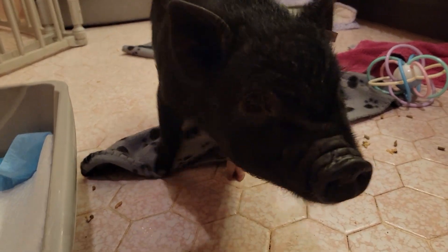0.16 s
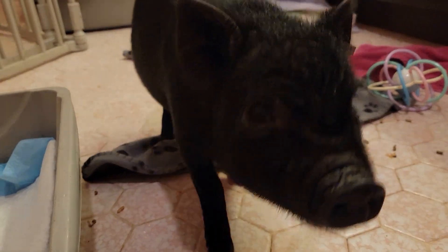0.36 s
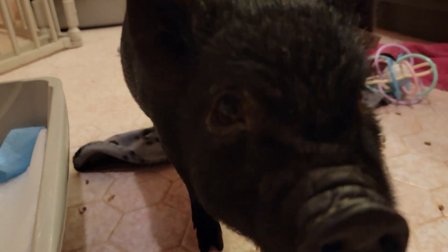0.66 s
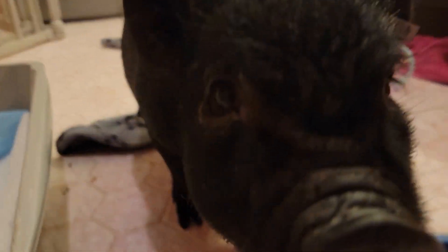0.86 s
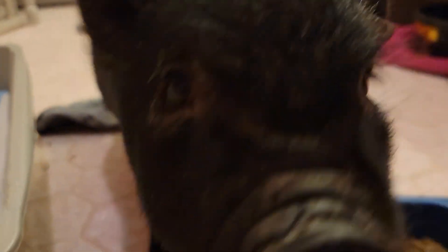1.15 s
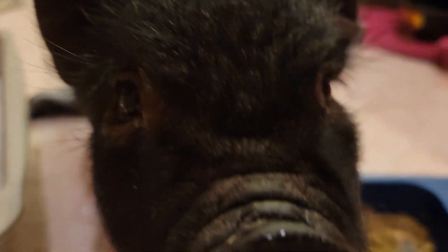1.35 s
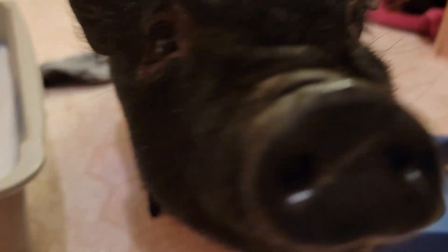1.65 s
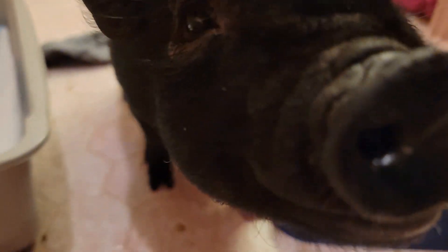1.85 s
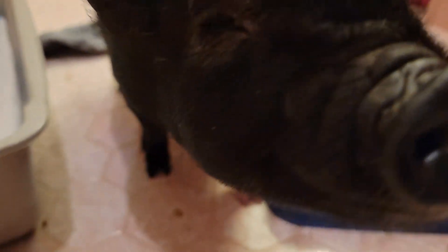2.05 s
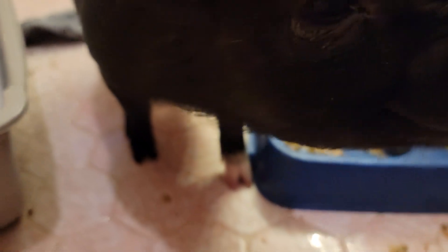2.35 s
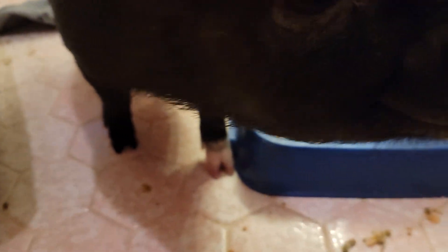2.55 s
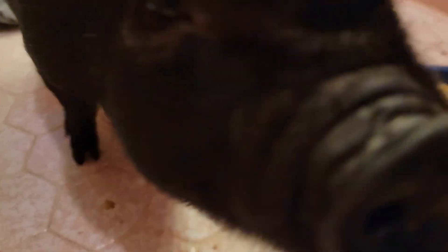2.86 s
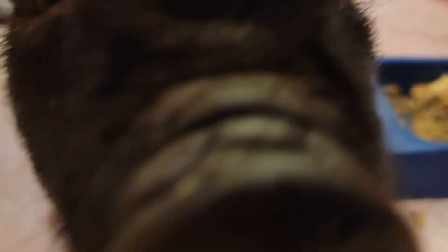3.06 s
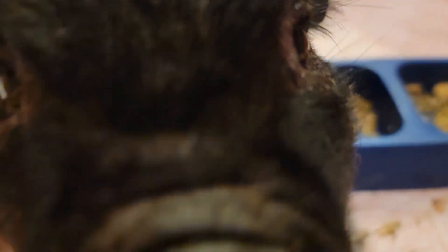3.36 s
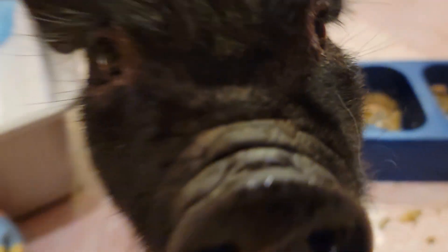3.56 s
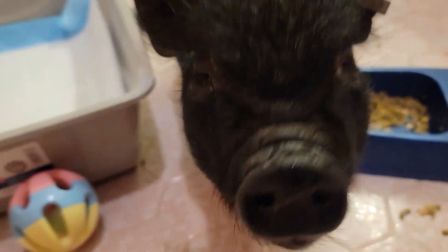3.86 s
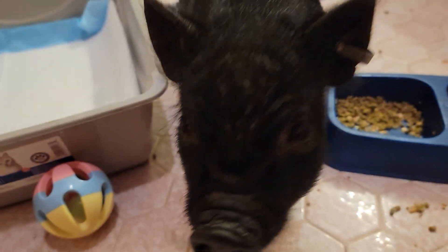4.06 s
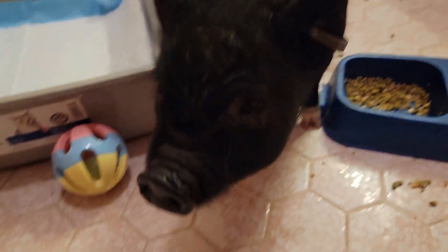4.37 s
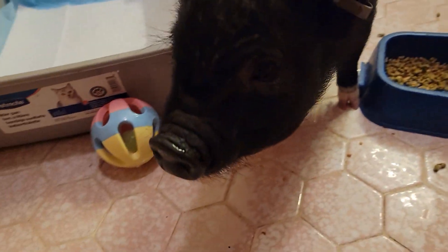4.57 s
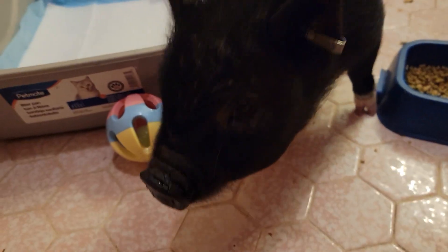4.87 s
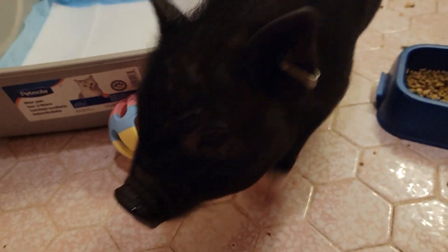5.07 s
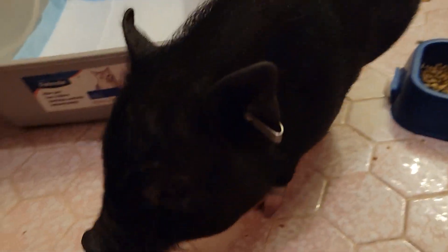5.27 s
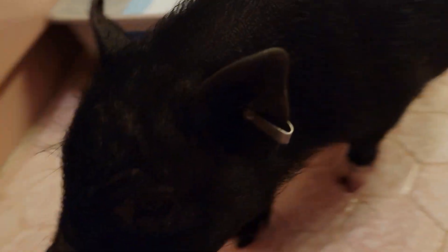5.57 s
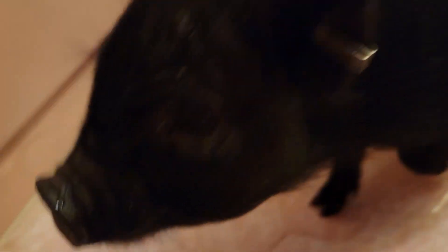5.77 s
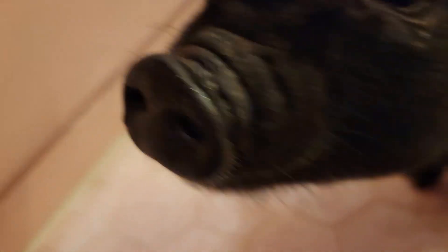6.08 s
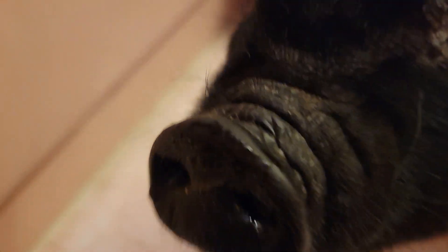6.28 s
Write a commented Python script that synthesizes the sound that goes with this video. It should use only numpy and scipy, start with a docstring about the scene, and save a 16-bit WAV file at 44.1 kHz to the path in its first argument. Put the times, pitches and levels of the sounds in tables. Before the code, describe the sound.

A small piglet gives short, creaky grunts right against the microphone in a tiled room, with two hollow bumps and a rustle at the end.

```python
"""A piglet grunts right at the microphone in a small tiled room, over a low background hush.
Each grunt is a few slow flaps of the vocal folds, clicks and gushes of noise that ring throat and snout;
then a noise puff leaves the nostrils. Something hollow is bumped twice: a noise crash, then dying sines.
Soft thuds are short low sines, hoof ticks dying clicks; sniffs and a growing rustle are swells of noise.
"""
import sys
import numpy as np
from scipy import signal
from scipy.fft import rfft, irfft, next_fast_len
from scipy.io import wavfile
from scipy.ndimage import uniform_filter1d

SR = 44100
rng = np.random.default_rng(int(sys.argv[2]) if len(sys.argv) > 2 else 0)


def unload_wav(signal):
    """Save mono or channel-first audio to the path in sys.argv[1] as 16-bit WAV at rate SR, clipped to [-1, 1]."""
    wavfile.write(
        sys.argv[1],
        SR,
        np.round(np.clip(np.atleast_2d(signal).T, -1, 1) * 32767).astype(np.int16),
    )


N = 283122


def amp(db):
    """Gain for a level in dB."""
    return 10 ** (np.asarray(db) / 20)


def evened(x):
    """Scaled to rms 1."""
    return x / np.sqrt(np.mean(x ** 2) + 1e-20)


def read(points, hz):
    """Reads (Hz, value) points on a log-frequency axis."""
    f, value = np.transpose(points)
    return np.interp(np.log(hz + 1), np.log(f + 1), value)


def along(curve, s):
    """Value of a control curve (s, value) at time s."""
    return np.interp(s, *np.transpose(curve))


def add(mix, s, sound):
    """Mixes a sound in at time s, cutting what falls outside."""
    start = round(s * SR)
    sound = sound[..., max(-start, 0):]
    part = mix[..., max(start, 0):][..., :sound.shape[-1]]
    part += sound[..., :part.shape[-1]]


def noise(spectrum, size):
    """Two channels of coloured noise at rms 1, most alike in the bass."""
    # likeness of left and right: f/Hz, correlation
    likeness = [(50, 0.54), (130, 1), (300, 0.79), (700, 0), (16000, 0.049)]
    padded = next_fast_len(size, True)
    hz = np.fft.rfftfreq(padded, 1 / SR)
    a, b = rfft(rng.standard_normal((2, padded)))
    same = np.clip(read(likeness, hz), -1, 1)
    pair = np.array([a, same * a + np.sqrt(1 - same ** 2) * b])
    return evened(irfft(pair * amp(read(spectrum, hz)), padded)[:, :size])


def ring(modes, t):
    """Dying sines from rows (Hz, dB, t60 in s)."""
    return sum(amp(db - 60 * t / t60) * np.sin(2 * np.pi * hz * t) for hz, db, t60 in modes)


def lowpass(x, hz, order):
    """Takes off the treble above hz."""
    return signal.sosfilt(signal.butter(order, min(hz, SR / 2.1), fs=SR, output="sos"), x)


def swells(rows):
    """A gain curve of smooth humps from rows (s of peak, length s, dB)."""
    t = np.arange(N) / SR
    return sum(amp(db) * np.exp(-(2 * (t - s) / length) ** 2) for s, length, db in rows)


def sputter(size, depth_db):
    """Uneven gain of air forced through wet nostrils, in grains of a few milliseconds."""
    grains = evened(uniform_filter1d(rng.standard_normal(size), size=140))
    return evened(amp(depth_db * grains))


def flap(times, levels_db, t, hz, rasp, rasp_length):
    """Spectrum of fold closures, each a click and a gush of turbulent air that rises fast and fades."""
    clicks, gush = 0, 0
    for s, db in zip(times, levels_db):
        clicks = clicks + amp(db) * np.exp(-2j * np.pi * hz * s)
        # the gush rises twice as fast as it fades
        gush = gush + amp(db) * np.exp(-np.maximum(t - s, 2 * (s - t)) / rasp_length)
    turbulence = rfft(gush * rng.standard_normal(len(t))) / np.sqrt(rasp_length * SR)
    return clicks + rasp * turbulence


def cavity(resonances, hz, stretch, scatter_db, nasal=False):
    """Response of ringing modes, mixed differently per channel; nasal ones start abruptly, each delayed."""
    travel_s = 0.001598  # the winding passages let each resonance out up to this much later
    out = 0
    for k, (centre, width, db) in enumerate(resonances):
        gain = amp(db + scatter_db * rng.standard_normal() * np.array([[1], [-1]]))
        if nasal:
            start = 1j * hz * np.exp(-2j * np.pi * hz * travel_s * rng.random())
        else:
            start = (-1) ** k * centre * stretch
        out = out + gain * start / ((width / 2 + 1j * hz) ** 2 + (centre * stretch) ** 2)
    return out * SR / (2 * np.pi)


def grunts():
    """Slow flaps swell in nose, chest and mouth; closures snap and ring the snout; a puff ends the grunt."""
    # one row a grunt: t of the hard closure/s, flap period/ms, body level/dB, snap level/dB,
    # swell across the snaps/dB, open mouth over the body/dB, puff level/dB,
    # hum of the nose f/Hz, upper snout resonance f/Hz
    grunt_rows = [ (-.04, 12.4, -23, -29, -13, -22, -46, 401, 4500),
                  (0.238, 16, -22.5, -24.5, -0.5, -8, -39.5, 438, 4200),
                  (.597, 13, -19.5, -22, -7.5, -9, -33.5, 410, 3900),
                  (0.829, 14, -22, -26.5, 3, -9.5, -35.5, 423, 4260),
                  (1.1517, 13.6, -22, -14, 6, -11, -34, 423, 4200),
                  (1.566, 14.6, -22.5, -15.5, 0.5, -20, -31, 451, 4630),
                  (1.909, 14.6, -24.5, -13.5, 0.5, -39, -29, 469, 4970),
                  (2.254, 17.6, -25.5, -21, -2, -8, -33.5, 470, 5530),
                  (2.753, 17.6, -25, -20, 1.5, -8, -30, 444, 4800),
                  (3.014, 14.1, -24, -17, 0.5, -10.5, -36.5, 438, 4570),
                  (3.198, 16.9, -25, -18, 4.5, -26, -42, 448, 4870),
                  (3.503, 15.6, -22, -17, 2.5, 2, -34, 523, 4560),
                  (3.891, 17.8, -24.5, -19, -1, -16, -35, 475, 5530),
                  (4.566, 18.9, -24, -19, 1, -32, -35.5, 505, 4700),
                  (5.007, 17.5, -26.5, -26, 1, -17, -37, 465, 5200),
                  (5.4184, 18.4, -25.5, -23.5, 7.5, -3, -38, 553, 3900),
                  (5.724, 19, -26, -29.5, 9, -24, -36.5, 558, 4300),
                  (6.026, 14.3, -22, -24.5, 2, -17, -36.5, 546, 4260),
                  (6.3, 14.1, -20, -23.5, -1, -12, -45, 490, 4160)]
    # the flaps of one grunt swell and fade; the third is the hard closure:
    # nose level/dB, chest level/dB, mouth level/dB
    flap_levels = [(-18.5, -11, -28), (-10, -0.5, -26), (-2.5, -6, -4), (0, 9, -4.5), (-1.5, 11, -7),
                   (-11, -30, -36)]
    # resonances of chest, mouth and snout: f/Hz (chest and mouth before a slight stretch), width/Hz, level/dB
    chest, mouth, snout_low = [(91.6, 14.2, -14), (158.5, 16.8, -11), (213.7, 161, -3)], [(556, 36, -0.5), (860, 73, -2.5), (1058, 57, 4)], [(710, 103, -4), (1027, 104, -14),
                                                             (1723, 96, -3.5), (2720, 290, -9),
                                                             (3042, 97, -6)]
    # resonances around the nose hum and at the upper snout: ratio to the grunt's own f, width/Hz, level/dB
    nose, snout_top = [(.84, 108, -4.5), (1, 56, 3), (1.2, 108, -6), (1.55, 135, -6)], [(0.998, 380, -3.5), (1.17, 600, -10.5)]
    # the closures that snap, one flap apart: level over the grunt's snap/dB, share of its swell,
    # f above which the treble falls/Hz
    snap_rows = [(-21, -0.82, 9600), (-1, -0.84, 27000), (0, 0.64, 4600), (-10.5, 0.39, 4000)]
    # clean in the middle grunts, raspy in the first and last: t/s, turbulence against the click
    hoarseness = [(.83, .9), (1.2, .25), (5.4, .25), (5.75, 1.2)]
    # the snout swings from side to side: t/s, left over right level/dB
    head_side = [(.6, -1.5), (1.57, 2.5), (2.25, -1), (2.75, -4), (3.2, 5.5), (3.5, 4), (3.9, 0.5),
                 (4.57, 1), (5.42, -3.5), (6.3, 0.5)]
    # the head hides the chest while it faces the microphone: t/s, chest level/dB
    chest_heard = [(1.2, 1.5), (3.2, 0.5), (3.8, -8.5), (4.6, -1.5)]
    # colour of the air through the nostrils: f/Hz, level/dB
    puff_colour = [(100, 6.5), (450, 5), (1200, 3.5), (1800, 1), (2700, 2.5), (3700, -3.5), (5800, -9.5),
                   (8000, -19.5), (16000, -19.5)]
    nose_sag = 0.069  # share by which the hum falls per flap as the grunt closes
    hoarse_hold_db = 9.5  # a hoarse grunt rasps on: dB gained per flap and unit of turbulence
    lag_ms_per_db = 0.3855  # the far channel hears the piglet later
    puff_after_flaps, puff_rise_s, puff_fall_s = 3.46, 0.024, 0.037

    out, lead, size = np.zeros((2, N)), .06, 10240  # lead in s ahead of the hard closure
    t, hz = np.arange(size) / SR, np.fft.rfftfreq(size, 1 / SR)
    nose_db, chest_db, jaw_db = np.transpose(flap_levels)
    # a small animal radiates no deep bass, and soft tissue swallows the top of the voice
    radiated = hz ** 3 / (hz ** 3 + 55 ** 3) / (1 + (hz / 6700) ** 8)
    beats = np.arange(len(flap_levels)) - 2  # 0 is the hard closure
    for s, period_ms, body_db, snap_db, swell_db, mouth_db, puff_db, hum_hz, upper_hz in grunt_rows:
        period, hoarse, pan_db = period_ms / 10 ** 3, along(hoarseness, s), along(head_side, s)
        times = lead + beats * period

        thump = flap(times, chest_db + along(chest_heard, s), t, hz, rasp=0.3, rasp_length=0.0007)
        body = thump * cavity(chest, hz, 0.99, scatter_db=-1.0)
        for beat, time, db in zip(beats, times, nose_db):
            hum = hum_hz * (1 - nose_sag * max(beat - 1, 0))
            closure = flap([time], [db], t, hz, rasp=1.0, rasp_length=0.019)
            body += closure * cavity(nose, hz, hum, scatter_db=3.5)
        jaw = flap(times, jaw_db, t, hz, rasp=1.0, rasp_length=0.0032)
        body += amp(mouth_db) * jaw * cavity(mouth, hz, 0.98, scatter_db=4.0)

        snout = snout_low + [(ratio * upper_hz, width, db) for ratio, width, db in snout_top]
        snap = 0
        for beat, time, (db, share, top_hz) in zip(beats[1:], times[1:], snap_rows):
            # each closure rings at slightly different pitches, more so in hoarse grunts
            detune = 1 + 0.02 * hoarse * rng.standard_normal()
            level_db = db + share * swell_db + hoarse_hold_db * hoarse * max(beat - 1, 0)
            closure = flap([time], [level_db], t, hz, rasp=hoarse, rasp_length=0.018 * hoarse)
            ringing = closure * cavity(snout, hz, detune, scatter_db=1.0, nasal=True)
            snap = snap + ringing / (1 + (hz / top_hz) ** 4)

        pan = amp([[pan_db / 2], [-pan_db / 2]])
        lag = lag_ms_per_db * pan_db / 10 ** 3
        arrival = np.exp(-2j * np.pi * hz * np.array([[-lag], [lag]]) / 2)
        # the snap leans half as far to the side as the body, in dB
        direct = amp(body_db) * pan * body + amp(snap_db) * np.sqrt(pan) * snap
        voice = irfft(direct * arrival * radiated, size)

        u = t - lead - puff_after_flaps * period
        puff = amp(puff_db - 5) * np.exp(-(u / np.where(u < 0, puff_rise_s, puff_fall_s)) ** 2)
        add(out, s - lead, voice + puff * sputter(size, depth_db=1.5) * noise(puff_colour, size))
    return out


def hush():
    """The low background: steady noise, strongest in the bass."""
    # f/Hz, level/dB
    hush_colour = [(20, -1), (80, 5), (200, -18), (800, -14.5), (2000, -19), (4000, -27.5), (6200, -29.5),
                   (8300, -48.5), (12000, -42)]
    return amp(-50.5) * noise(hush_colour, N)


def room(x):
    """A tail off tiles and walls, dying band by band, and a few standing waves."""
    # dying time by band: f/Hz, t60/s
    room_t60 = [(100, 0.49), (260, 0.46), (700, 0.34), (1840, 0.35), (4850, 0.25), (14000, 0.12)]
    # colour of the tail: f/Hz, level/dB
    room_colour = [(60, -10.5), (150, -4.5), (400, -4), (1000, -11), (3000, -9.5), (12000, -7.5)]
    # standing waves: f/Hz, level among themselves/dB, t60/s
    room_modes = [(153.8, -45, 0.45), (214.7, -51.5, 0.57), (378.8, -36.5, 0.16)]
    hz, t, z = signal.stft(noise([(20, 0), (20000, 0)], SR), SR, nperseg=512)
    t60 = read(room_t60, hz)[:, None]
    decay = amp(read(room_colour, hz)[:, None] - 60 * t / t60)
    z = z * decay * np.sqrt(2 * np.log(1000) / t60 / SR)  # even energy whatever the t60
    t = np.arange(SR) / SR
    tail = signal.istft(z, SR, nperseg=512)[1][:, :SR] * (1 - np.exp(-t / .006))
    tail = tail + amp(-15.5) * ring(room_modes, t)
    return signal.fftconvolve(x, tail, axes=1)[:, :N]


def bumps():
    """A short crash, then the deep ring and rumble of a hollow body."""
    # t/s, crash level/dB, crash decay/s, boom level/dB, boom length factor
    bump_rows = [(0.393, -23.5, 0.039, -44, 0.26), (0.4082, -6, 0.0099, -8, 0.34),
                 (0.416, -27, 0.087, -3.5, 1), (5.6107, -13, 0.0027, -11.5, 0.072),
                 (5.631, -60, 0.017, -9, 0.53)]
    # ring of the hollow body: f/Hz, level/dB, t60 at length factor 1/s
    hollow = [(52.4, -18.5, 1), (77.4, -22.5, 0.5), (94.2, -3, 0.71), (200, -20.5, 1), (318.6, -9, 0.13),
              (644, -33.5, 1), (1353, -26, 0.41)]
    # colours of crash and rumble: f/Hz, level/dB
    crash_colour, rumble_colour = [(60, -3), (200, -17), (700, -4), (1300, -11), (2400, -16), (5500, -21),
                                   (7500, -36), (15500, -37)], [(20, -27), (50, 11), (130, 6.5), (300, -10), (700, -18),
                                                  (3000, -65)]
    out, t = np.zeros((2, N)), np.arange(SR) / SR
    for s, crash_db, decay, boom_db, length in bump_rows:
        crash = amp(crash_db) * noise(crash_colour, SR) * np.exp(-t / decay) * (1 - np.exp(-t / 0.00088))
        boom = ring([(hz, db, t60 * length) for hz, db, t60 in hollow], t)
        rumble = noise(rumble_colour, SR) * np.exp(-t / (0.16 * length))
        boom = boom + amp(-16.0) * length * rumble
        add(out, s, crash + amp(boom_db) * boom * (1 - np.exp(-t / 0.0014)))
    return out


def thuds():
    """Soft dull thuds: a low sine that swells for 12 ms and dies."""
    # t/s, level/dB, f/Hz
    thud_rows = [(0.752, -28, 99), (2.13, -33.5, 83.5), (2.38, -36, 87.6), (3.284, -25.5, 77),
                 (3.317, -28, 95.6), (4.19, -42, 58.4), (5.218, -38.5, 71)]
    out, t = np.zeros((2, N)), np.arange(SR // 4) / SR
    u = t / 0.012
    for s, db, hz in thud_rows:
        add(out, s, amp(db) * u * np.exp(1 - u) * np.sin(2 * np.pi * hz * t))
    return out


def rustle_and_snuffle():
    """A restless rustle close by and fine nostril hiss: noise swells under one shared flutter."""
    # rustles, each swelling and fading: t of peak/s, length/s, level/dB
    rustle_rows = [(3.1, 0.5, -60.5), (4.6, 2, -63), (5.62, 0.16, -39), (5.77, 0.16, -46.5),
                   (6.04, 0.42, -45.5), (6.355, 0.16, -36.5)]
    # hiss of the nostrils when they point at the microphone: t of peak/s, length/s, level/dB
    snuffle_rows = [(3.18, 0.85, -63.5), (6.36, 0.18, -57)]
    # colour of the rustle: f/Hz, level/dB
    rustle_colour = [(290, -28), (500, 6), (700, 0), (1620, 0.5), (2300, -8.5), (3630, 3), (5050, -3),
                     (8360, -22.5), (15500, -23.5)]
    flutter = evened(uniform_filter1d(rng.standard_normal(N), size=900))
    hiss = noise([(1000, -28), (8000, -10), (12500, -4), (16000, -5)], N)
    rustle = swells(rustle_rows) * noise(rustle_colour, N)
    return amp(1.4 * flutter) * (rustle + swells(snuffle_rows) * hiss)


def ticks():
    """Hoof ticks and wet clicks of the snout: a sharp dying click with a scuff of noise."""
    # t/s, level/dB, f of the scuff's strongest band/Hz (the click rings at half of it)
    tick_rows = [(3.391, -30.5, 3780), (4.732, -27, 3570), (4.816, -31, 1920), (5.392, -31, 790),
                 (5.612, -6.5, 1620), (6.011, -13.5, 3230)]
    out, t = np.zeros((2, N)), np.arange(SR // 4) / SR
    for s, db, hz in tick_rows:
        click = np.exp(-t * hz * 2) * np.cos(2 * np.pi * hz * t / 2)
        scuff = noise([(hz / 8, -10), (hz, 0), (hz * 3, -14)], len(t)) * np.exp(-t / 0.0076)
        add(out, s, amp(db - 0.5) * lowpass(click + 0.19 * scuff, 2.0 * hz, order=2))
    return out


def sniffs():
    """Air drawn in through the nostrils: short swells of sputtering noise."""
    # t of peak/s, length/s, level/dB
    sniff_rows = [(4.485, 0.12, -48), (5.262, 0.09, -41)]
    # f/Hz, level/dB
    sniff_colour = [(700, -10), (2000, 2), (2600, -4.5), (3700, -0.5), (5500, -9), (8000, -24.5),
                    (14000, -37)]
    return swells(sniff_rows) * sputter(N, depth_db=2) * noise(sniff_colour, N)


def scene():
    """Piglet, bumps, thuds and ticks in the room, with sniffs, rustle and hush."""
    pig, knocks, feet = grunts(), bumps(), thuds() + ticks()
    # the boom stays close: only the clatter above 400 Hz reaches the walls
    clatter = signal.sosfilt(signal.butter(2, 400, "high", fs=SR, output="sos"), knocks)
    wet = room(pig + amp(5.0) * feet + amp(6.0) * clatter)
    return pig + knocks + feet + wet + rustle_and_snuffle() + sniffs() + hush()


def record(dry):
    """Microphone ports dip in the treble, the right hears more top; peaks round off, then a band limit."""
    full_scale, edge_hz = .92, 16000
    size = next_fast_len(N, True)
    hz = np.fft.rfftfreq(size, 1 / SR)
    dip_db = -6 * np.exp(-((hz - 8200) / 1000) ** 2)
    # left over right: f/Hz, level/dB
    balance_db = read([(250, 1), (2000, 3.0), (4500, -1.5), (8000, 3.5), (12000, -7.0)], hz)
    ports = amp([dip_db + balance_db / 2, dip_db - balance_db / 2])
    coloured = irfft(rfft(dry, size) * ports, size)[:, :N]
    limited = coloured / (1 + (coloured / full_scale) ** 8) ** (1 / 8)
    band = signal.firwin(511, edge_hz, window=("kaiser", 9), fs=SR)
    return signal.oaconvolve(limited, band[None], "same", axes=1)


dry = scene()
out = record(dry)
unload_wav(out)
```